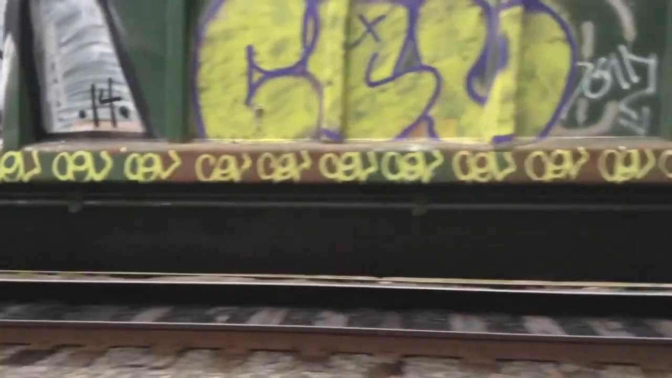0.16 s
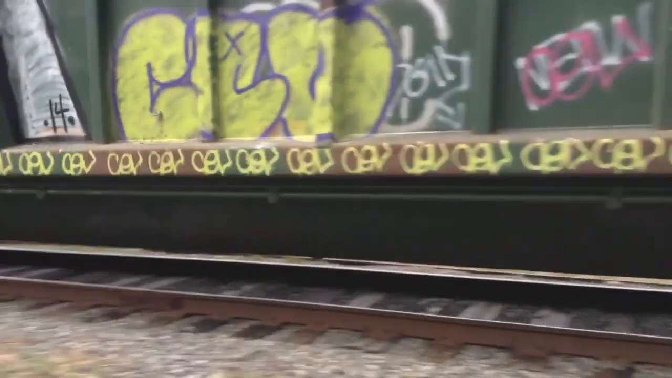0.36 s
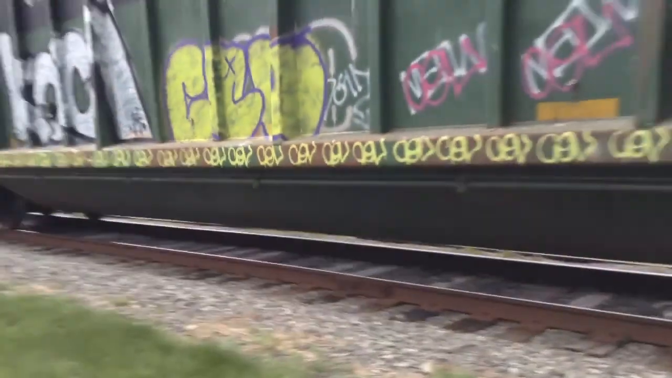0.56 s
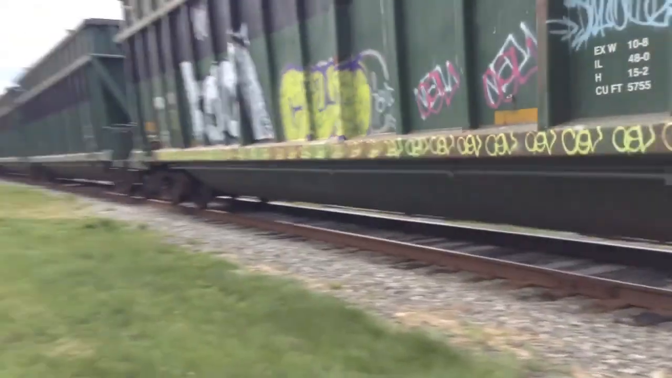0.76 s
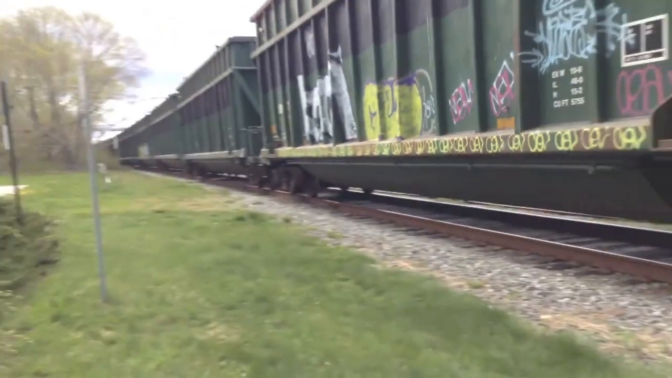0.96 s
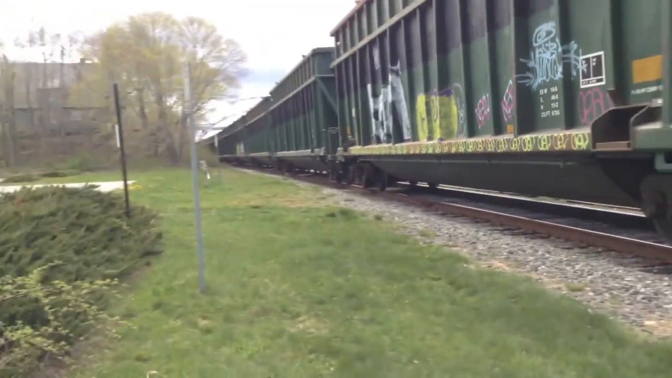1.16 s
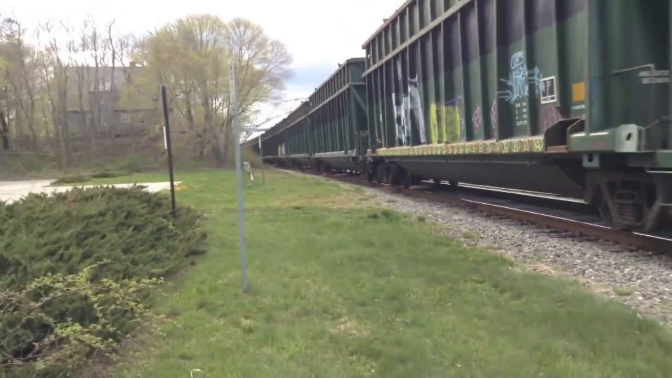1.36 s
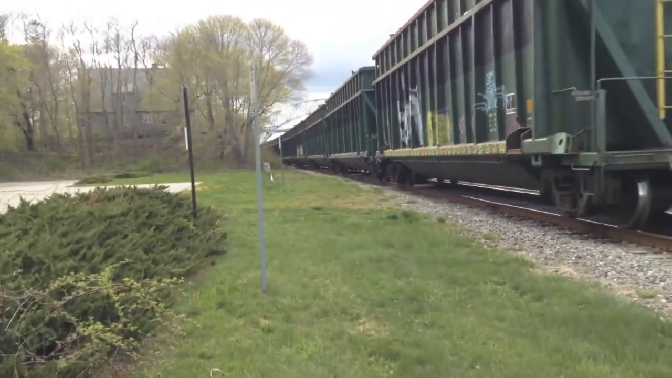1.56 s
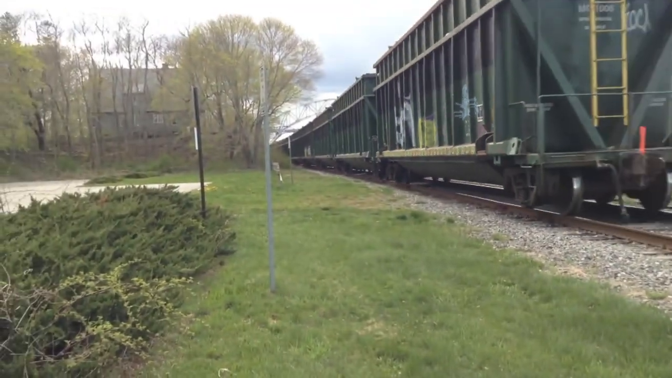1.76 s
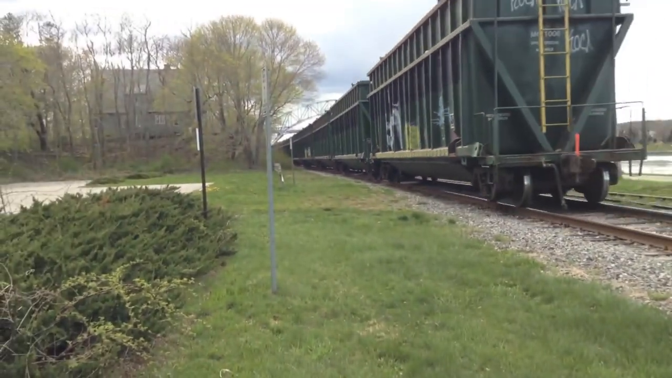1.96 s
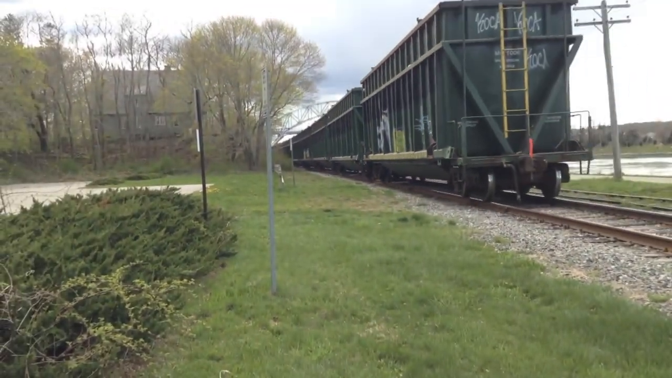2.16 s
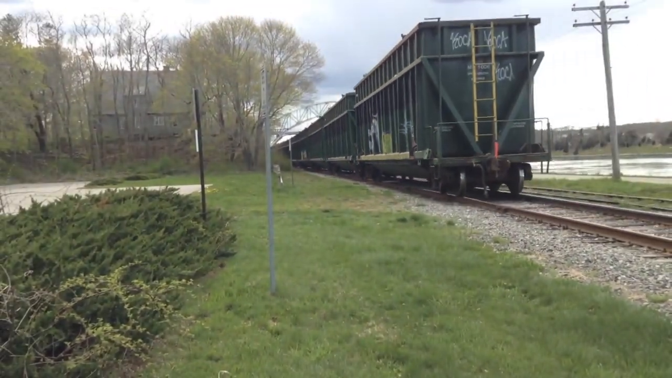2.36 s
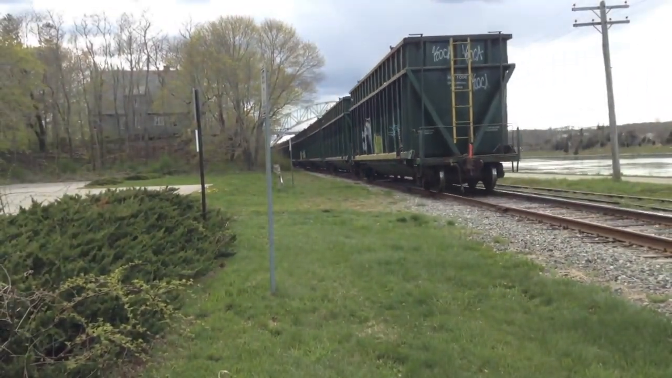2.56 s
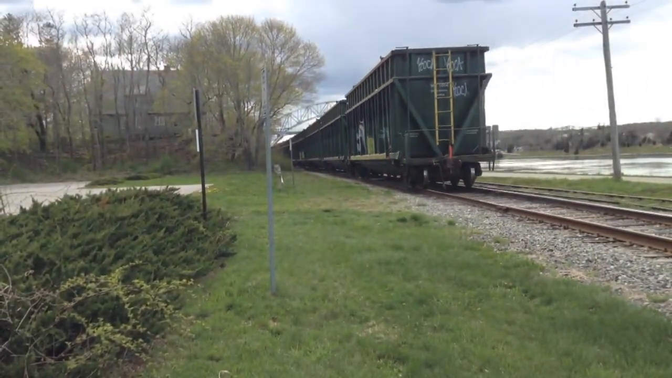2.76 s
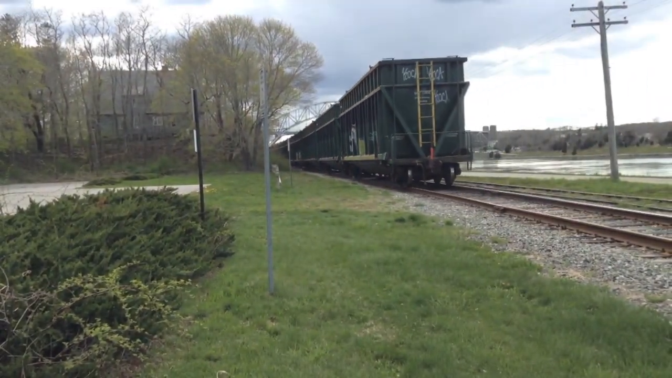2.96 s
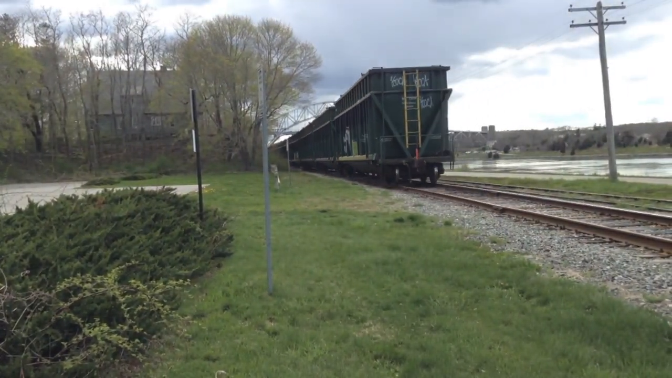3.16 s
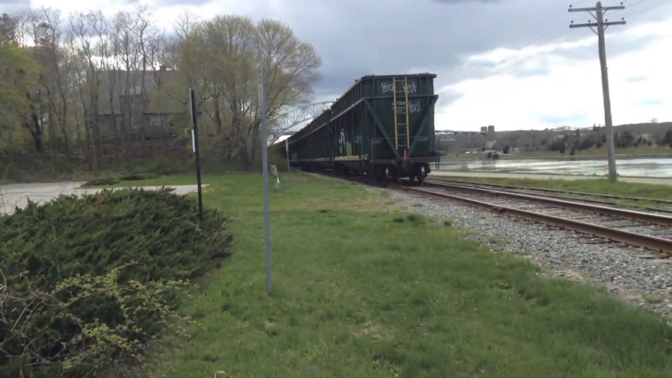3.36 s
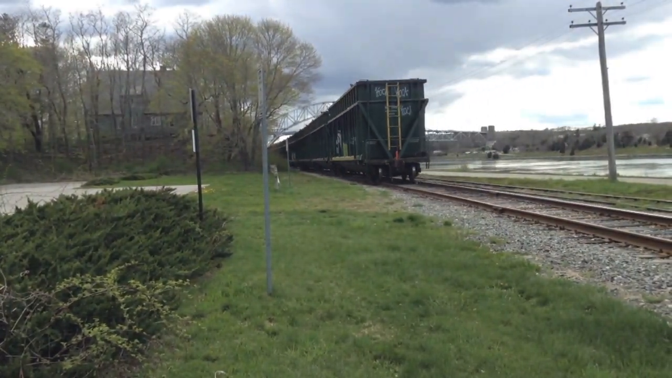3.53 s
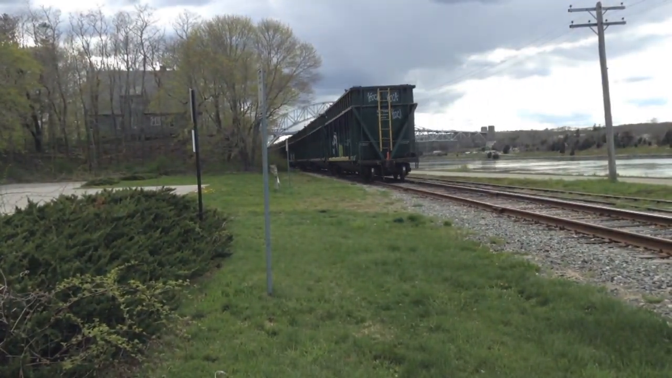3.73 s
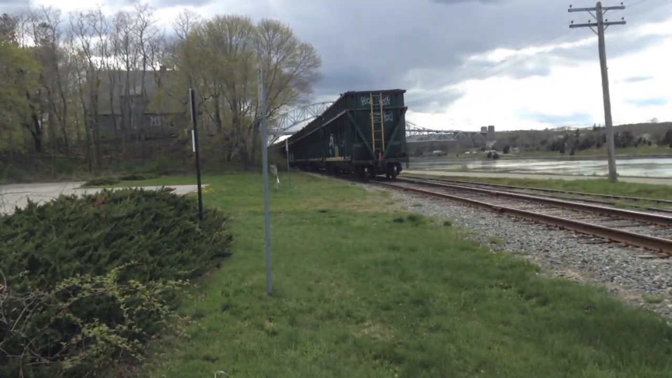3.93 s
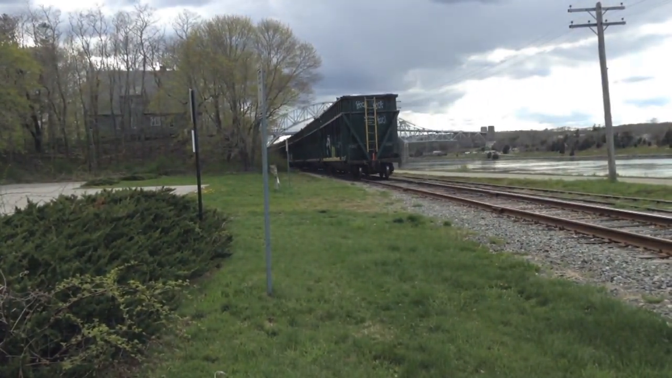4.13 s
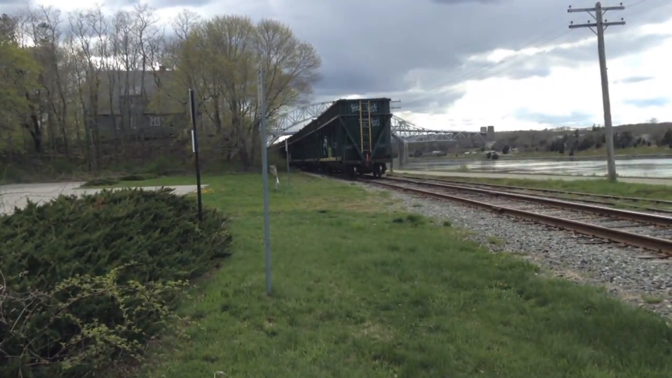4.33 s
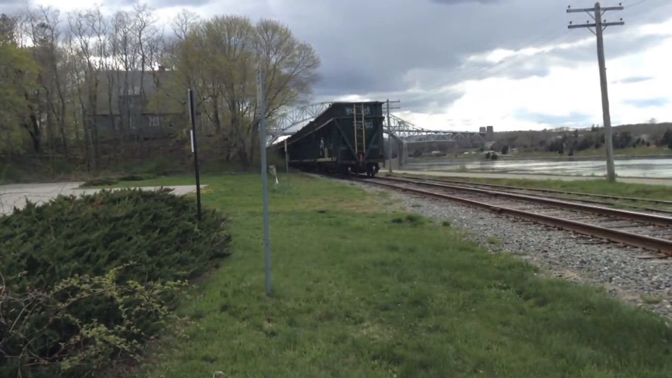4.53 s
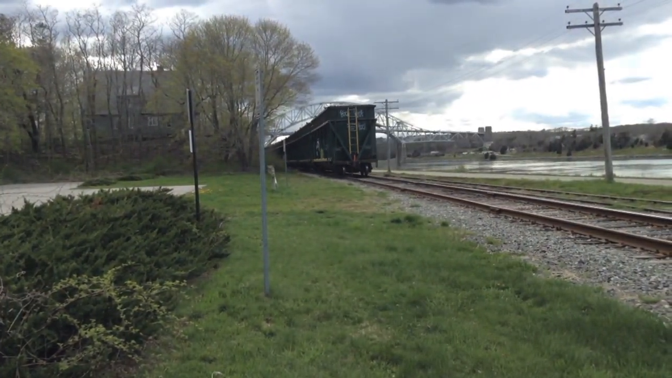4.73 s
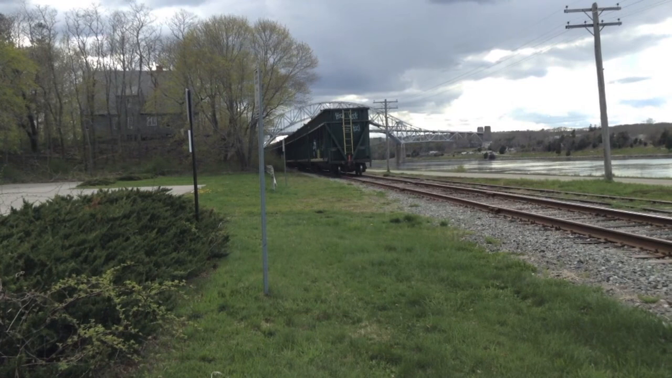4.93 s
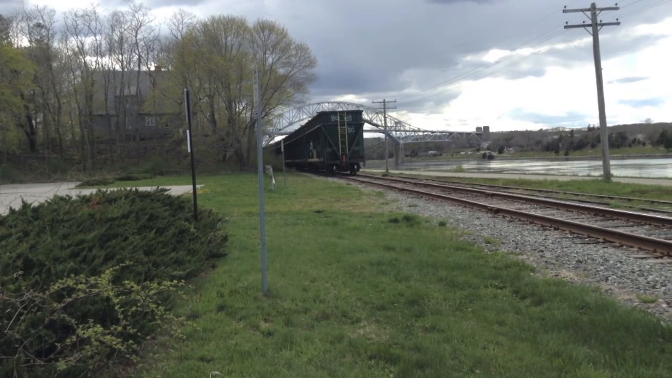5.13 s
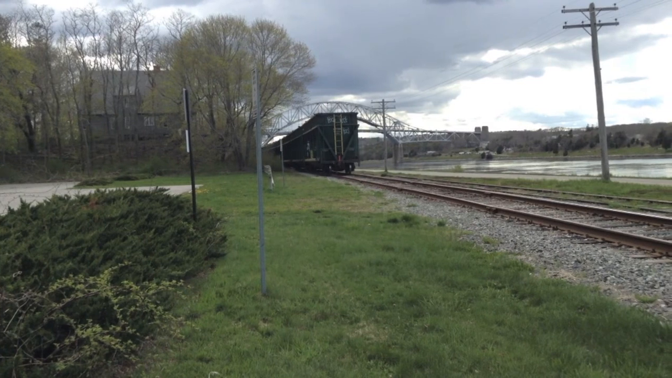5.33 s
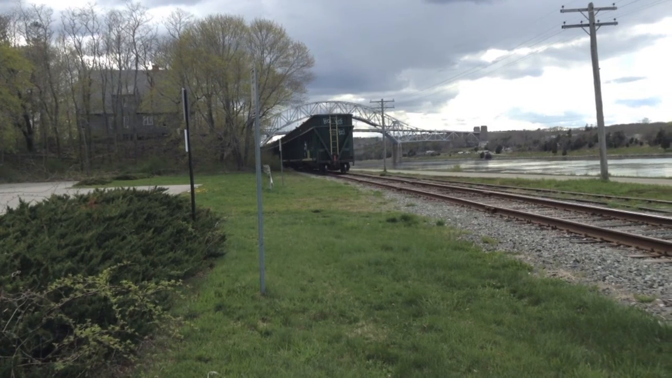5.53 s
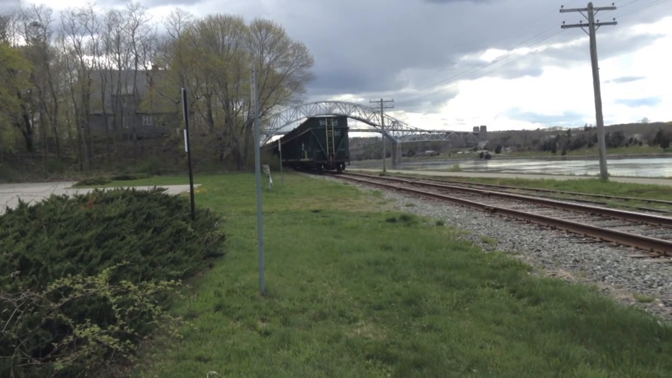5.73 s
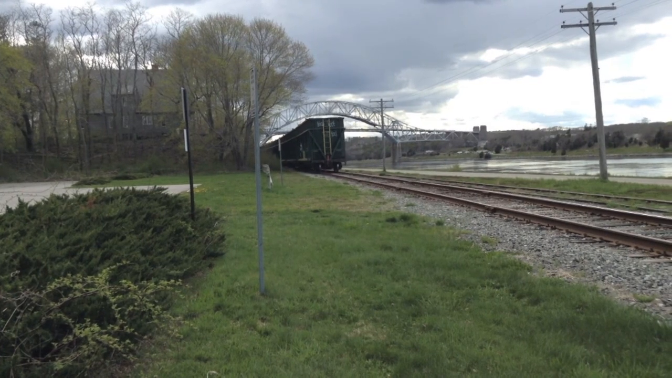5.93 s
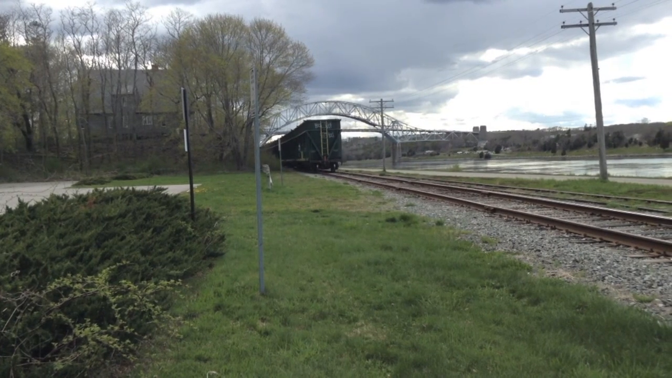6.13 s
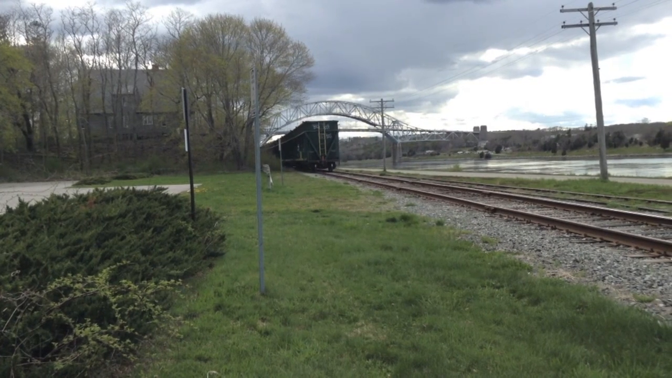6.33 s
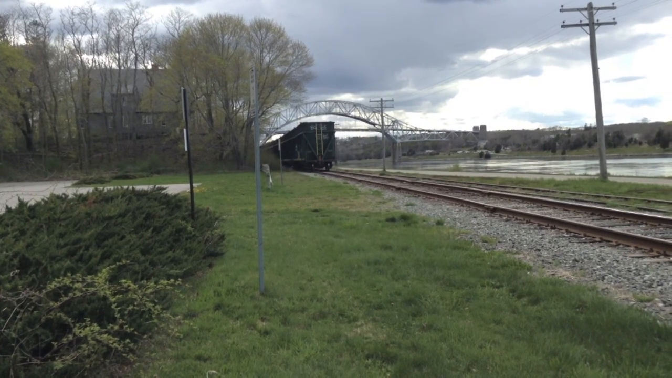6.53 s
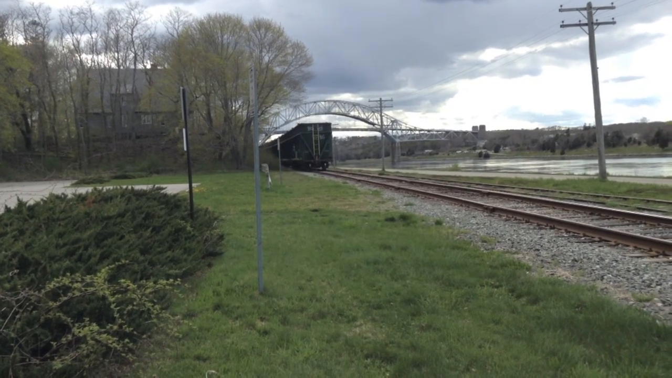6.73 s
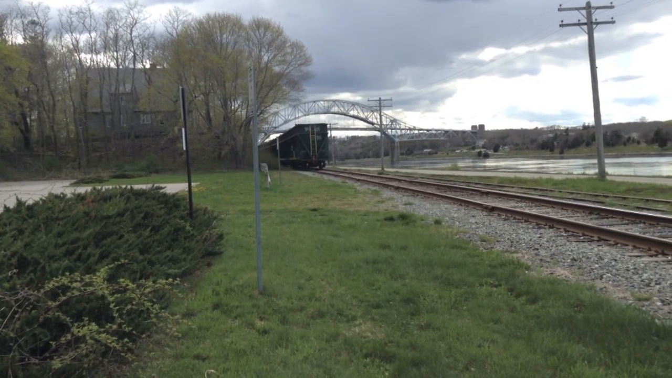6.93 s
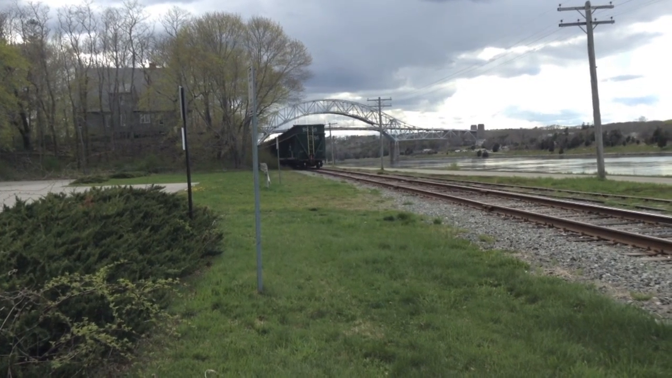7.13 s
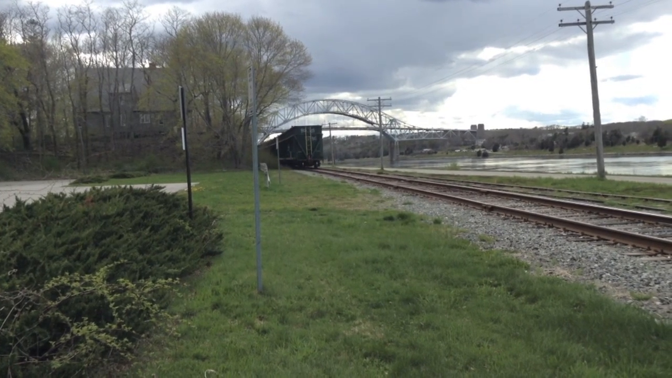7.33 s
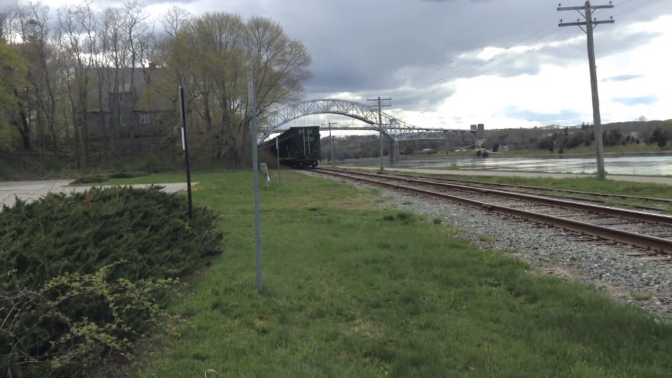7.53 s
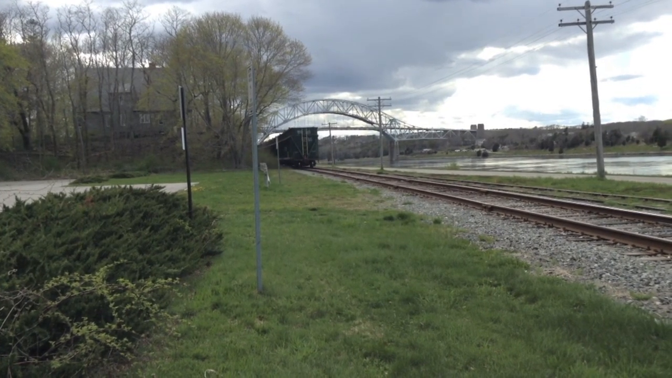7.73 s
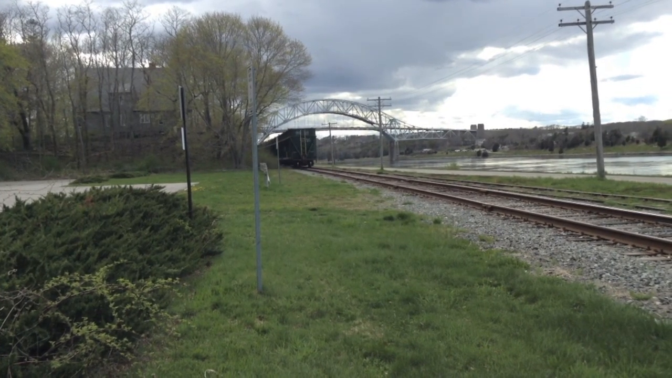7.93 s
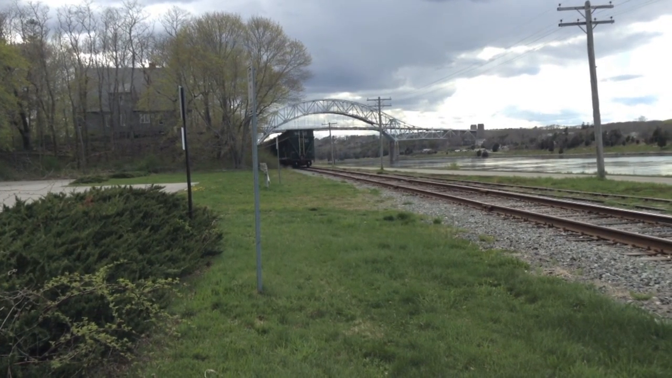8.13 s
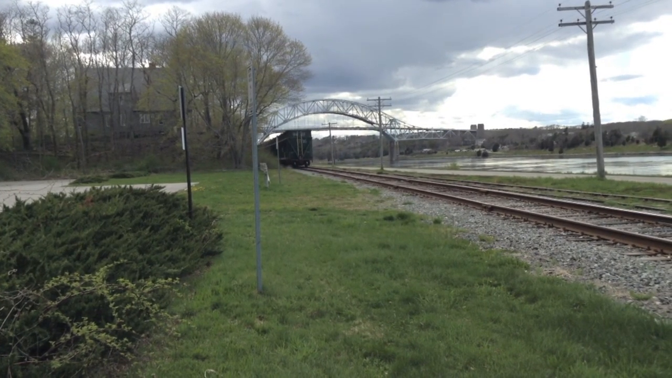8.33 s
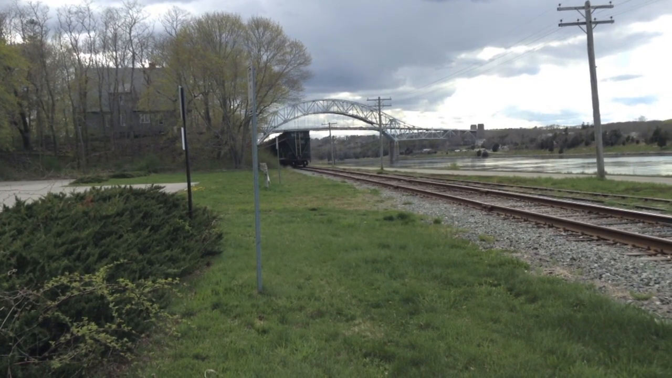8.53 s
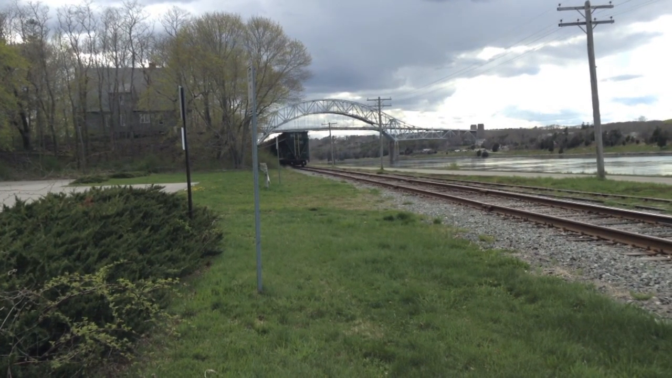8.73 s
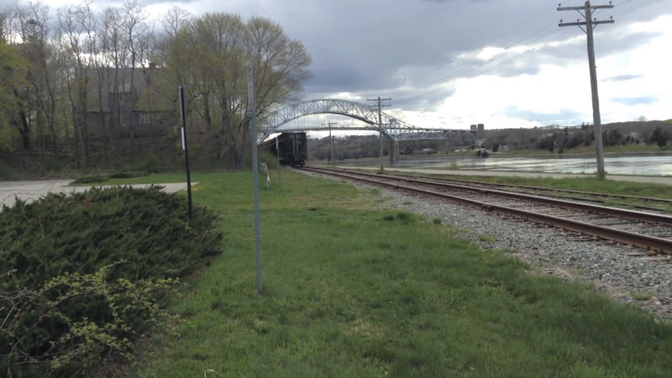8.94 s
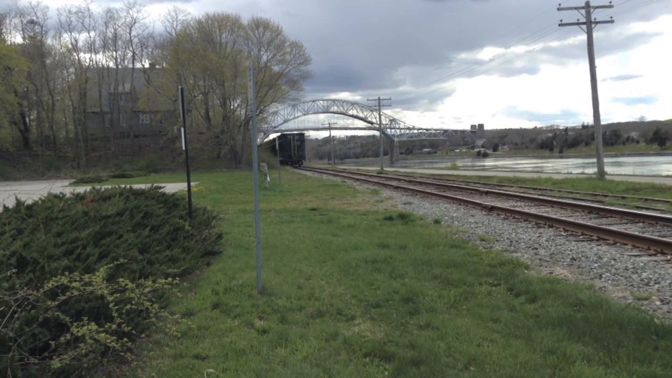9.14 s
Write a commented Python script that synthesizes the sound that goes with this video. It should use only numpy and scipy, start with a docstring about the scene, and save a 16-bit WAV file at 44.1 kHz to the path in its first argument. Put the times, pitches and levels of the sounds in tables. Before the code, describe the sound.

Heavy rail wagons rumble by with joint knocks, steel clanks and piercing wheel squeals, then fade into distant, pulsing metallic grinding outdoors.

```python
"""Beside a curved railway, a few metres off: the last cars of a freight train roll past and recede over grass.
Noise through panel resonances makes the rumble; struck modes and noise bursts make joints, clanks and taps.
Flanges grind in surges about once a second: stick-slip grains excite wheel resonances.
Jittered tones make the wheels squeal and sing. With distance the ground swallows a band of the rumble."""
import sys
import numpy as np
from scipy import signal
from scipy.fft import rfft, irfft, next_fast_len
from scipy.io import wavfile
from scipy.ndimage import uniform_filter1d, map_coordinates

SR = 44100
rng = np.random.default_rng(int(sys.argv[2]) if len(sys.argv) > 2 else 0)


def master(y):
    """Save y as 16-bit WAV."""
    cut = np.clip(np.atleast_2d(y).T, -1, 1)
    pcm = np.round(cut * 32767)  # scale
    wavfile.write(sys.argv[1], SR, pcm.astype(np.int16))


N = 405279
T = np.arange(N) / SR
FRAME = 1024  # samples in one frame of a moving filter

# the train's steady speed [m/s], and how far the track is from the listener [m]
SPEED_M_S, TRACK_M = 7.5, 4.5
# when the grinding wheel and the tail of the train go by [s]
WHEEL_PASSES_S, TAIL_PASSES_S = 1.08, 1.795
# the train is 3 dB down when its tail is FADE_M away; ground and air have their full effect at FAR_M
FADE_M, FAR_M = 14.25, 49


def undb(db):
    """Logarithmic level: decibels to amplitude gain."""
    return 10 ** (np.asarray(db) / 20)


def curve(rows, t=T):
    """Linear interpolation of a table (time [s], value)."""
    return np.interp(t, *np.transpose(rows))


def unit(x):
    """Power normalisation: scale to rms 1."""
    return x / np.sqrt(np.mean(x ** 2))


def walk(rate, t=T):
    """Band-limited fluctuation: random knots, rate per second, joined by lines; spread about 1."""
    knots = rng.standard_normal(len(t) // 16 + 2)
    return 1.22 * np.interp((t - t[0]) * rate, np.arange(len(knots)), knots)


def colour(x, points, peaks=()):
    """Linear filtering: give x a smooth spectrum with resonances on top; rms 1."""
    size = next_fast_len(N, True)
    hz = np.arange(size // 2 + 1) * SR / size + 1e-3
    at, db = np.transpose(points)
    db = np.interp(np.log(hz), np.log(at), db)
    for centre, width, peak_db in peaks:
        db = db + peak_db / (1 + (2 * (hz - centre) / width) ** 2)
    spectrum = rfft(x, size) * undb(db)
    return unit(irfft(spectrum, size)[:N])


def reshape(x, gain_db):
    """Time-varying filtering in short frames: gain_db(seconds, Hz)."""
    hz, t, z = signal.stft(x, SR, nperseg=FRAME)
    filtered = z * undb(gain_db(t, hz[:, None] + 1))
    return signal.istft(filtered, SR, nperseg=FRAME)[1][:N]


def grains(rate, spread_db):
    """Shot noise: dense tiny impacts, about rate per second, of uneven size; rms 1."""
    size = undb(spread_db * np.minimum(rng.exponential(size=N), 5))
    impacts = rng.random(N) < rate / SR
    return unit(impacts * size * rng.standard_normal(N))


def tone(hz, width_hz, flutter_db, t=T):
    """Friction-driven oscillation: the pitch jitters and the grip comes and goes; rms 1."""
    jitter = 0.9 * walk(265, t) + 0.295 * walk(17.8, t)
    phase = 2 * np.pi * np.cumsum(hz + width_hz * jitter) / SR
    flutter = walk(34.2, t) + 2.2 * walk(139, t)
    return unit(np.sin(phase) * undb(flutter_db * flutter))


def add(out, start, sound):
    """Superposition: mix a sound into out from its start time on."""
    place = out[max(int(start * SR), 0):][:len(sound)]
    place += sound[:len(place)]


def blows(times, db):
    """Impulsive excitation: one impulse at each time."""
    return np.bincount(np.clip(times * SR, 0, N - 1).astype(int), undb(db), N)


def ring(push, modes):
    """Modal resonance: damped modes set ringing by a force; neighbours swing opposite ways."""
    out = 0
    for k, (hz, db, t60) in enumerate(modes):
        pole = np.exp((2j * np.pi * hz - np.log(1000) / t60) / SR)
        swing = signal.lfilter([1], [1, -pole], push + 1e-18).imag
        out = out + (-1) ** k * undb(db) * swing
    return out


def burst(hits, rise, t60, tail_db, tail_t60, delay=0):
    """Exponential decay after each impulse: quick rise, quick fall and a weaker tail."""
    age = np.maximum(T[:SR] - delay, 0)
    tail = undb(tail_db) * np.exp(-np.log(1000) * age / tail_t60)
    fall = np.exp(-np.log(1000) * age / t60) + tail
    return signal.fftconvolve(hits, (1 - np.exp(-age / rise)) * fall)[:N]


def gone_m(t):
    """Uniform motion: how far the tail of the train has rolled past the listener."""
    return SPEED_M_S * np.maximum(t - TAIL_PASSES_S, 0)


def spreading_db(t=T):
    """Geometric spreading: the (negative) level change as the train recedes."""
    return -10 * np.log10(1 + (gone_m(t) / FADE_M) ** 2)


def farness(t=T):
    """Propagation over ground and through air: how much it colours the sound, 0 near, 1 far."""
    return np.minimum(gone_m(t) / FAR_M, 1) ** 1.96


def doppler():
    """Doppler effect: pitch factor of the grinding wheel, above 1 as it comes, below as it goes."""
    along = SPEED_M_S * (T - WHEEL_PASSES_S)
    return 1 - SPEED_M_S / 343 * along / np.hypot(along, TRACK_M)


# flanges press against the rail; levels are close by, before the overall gain of the grinding:
# (start [s], attack [s], hold [s], level [dB], sharpness = top against middle [dB], lingering scrape [dB])
SURGES = [(-0.1, 0.039, 0.34, -20.5, -1, -22), (0.11, 0.061, 0.18, -21.5, 4, -6),
          (0.295, .006, 0.029, -20.5, 0, -28), (0.42, .05, 0.25, -36, 5, -7),
          (0.762, 0.011, 0.35, -26, 4.5, -5.5), (1.15, 0.059, 0.25, -34, -1.5, -8),
          (1.416, .003, .008, -29.5, 9, -18), (1.448, 0.005, 0.67, -24.5, 3.5, -5),
          (1.468, 0.007, 0.058, -23.5, 0, -4), (2.488, 0.022, 0.086, -35, 10, -0.5),
          (2.61, 0.03, 0.44, -28, 3, -1), (3.548, 0.041, 0.35, -23, -1, -3),
          (4.398, 0.022, 0.29, -23.5, -2, 1.5), (5.318, 0.035, 0.34, -24.5, -0.5, -3),
          (5.803, 0.025, 0.12, -27.5, -3.5, -7), (6.394, 0.012, 0.64, -28, 0.5, -4.5),
          (7.4, 0.052, 0.28, -29, -4, 0.5), (7.88, 0.042, 0.21, -28, -2.5, -5.5),
          (8.29, .02, 0.062, -31.5, -1.5, 0), (8.502, 0.026, 0.44, -28, -4.5, -7)]
# a surge lets go quickly, leaving a scrape that dies slowly [s]
RELEASE_S, LINGER_S = 0.027, 0.39
# light rubbing of all the flanges: level before the overall gain, sharpness, sharpness change far off [dB]
RUB_DB, RUB_SHARP_DB, RUB_DULLING_DB = -32.5, -10, 1.5
# the share of the loss with distance that this rubbing suffers, coming from the whole length of the train
RUB_FADE = 0.92
# the last wagon screens the rubbing [dB]; the screen opens over this time [s] until its end has passed
SCREEN_DB, SCREEN_OPENS_S = -6.5, 0.63


def flange_contact():
    """Power addition: level and sharpness [dB] of surges over rubbing; the stronger sets the sharpness."""
    screened = np.clip((TAIL_PASSES_S - T) / SCREEN_OPENS_S, 0, 1)
    power = undb(RUB_DB + RUB_FADE * spreading_db() + SCREEN_DB * screened) ** 2
    sharp = power * (RUB_SHARP_DB + RUB_DULLING_DB * farness())
    for start, attack, hold, db, sharp_db, linger_db in SURGES:
        age = np.maximum(T - start, 0)
        after = np.maximum(age - hold, 0)
        linger = undb(linger_db)
        release = (1 - linger) * np.exp(-after / RELEASE_S) + linger * np.exp(-after / LINGER_S)
        peak = undb(db + spreading_db(start + hold / 2))
        surge = (peak * (1 - np.exp(-age / attack)) * release) ** 2
        power, sharp = power + surge, sharp + surge * sharp_db
    return 10 * np.log10(power), sharp / power


# spectrum of the grinding: (frequency [Hz], density [dB per Hz])
GRIND_COLOUR = [(400, -23.5), (900, -5.5), (1700, -2.5), (2700, 1), (3500, -3), (5300, -1), (7000, -.5),
                (8700, -1), (10200, -3.5), (12000, -5), (13300, -5), (15300, -11.5)]
# wheel resonances under it, at their final receding pitch: (frequency [Hz], width [Hz], height [dB])
WHEEL = [(1436, 44, 4.5), (1828, 47, 7.5), (3120, 45, 5.5), (4350, 1300, 5), (6050, 620, 5.5),
         (7520, 160, 6), (7930, 180, 6), (9360, 240, 4.5), (10990, 440, 4)]


def grinding():
    """Stick-slip friction: grains between flange and rail ring the wheel; harder contact is sharper."""
    level_db, sharpness_db = flange_contact()
    slips = grains(rate=30000, spread_db=1.0) * undb(.5 * walk(45) + 0.47 * walk(220))
    resonant = colour(slips, GRIND_COLOUR, WHEEL)
    # all these resonances sink with the Doppler shift, relative to its last value
    shift = doppler()
    scrape = map_coordinates(resonant, [np.cumsum(shift / shift[-1])], order=3, mode="mirror")

    def contact_db(t, hz):
        sharp_db = np.interp(t, T, sharpness_db)
        octaves = np.log2(hz / 4000)
        # a sharp contact gains treble and loses its lower rasp
        treble_db = sharp_db * np.clip(octaves / 1.05, -.15, 1.6)
        rasp_db = 1.84 * np.maximum(sharp_db, 0) * np.clip(octaves, -2, 0)
        # the contact point wanders, so the wheel's many fine modes take turns to ring
        modes = rng.standard_normal((len(hz), len(t)))
        modes = unit(uniform_filter1d(uniform_filter1d(modes, size=14), size=5))
        air_db = -13 * farness(t) * (hz / 13000) ** 4
        return treble_db + rasp_db + 3.94 * modes + air_db
    return reshape(scrape * undb(level_db + 4.5), contact_db)


# the wheels' squeals build up, hold and ring out: (start [s], build-up [s], hold [s], level [dB],
# fall [dB per s], frequency [Hz], roughness [0-1])
SQUEALS = [(0, .3, .06, -20.5, 43, 6180, .7), (.768, .024, .021, -12.5, 650, 6140, .2),
           (.838, .01, .009, -14, 900, 6125, .15), (.8, .02, .24, -17.3, 72, 6140, .8),
           (1.11, .03, .1, -26, 160, 6020, .35), (1.42, .13, .23, -24.5, 45, 5995, .5),
           (2.45, .45, .14, -22.8, 65, 7660, .25), (2.66, .25, .22, -30, 75, 6020, .85),
           (4.383, .18, .13, -26, 33, 5970, .3), (6.4, .07, .47, -43, 30, 5950, .75)]
# the level a squeal grows from (against its peak), and how fast a rough one's grip changes
SQUEAL_SEED_DB, GRIP_HZ = -23, 260


def squealing():
    """Self-excited vibration: a mode grows until grip saturates, then rings out; uneven grip roughens it."""
    out, age = np.zeros(N), T[:2 * SR]
    for start, build, hold, db, db_per_s, hz, rough in SQUEALS:
        growth_db = SQUEAL_SEED_DB * np.clip(1 - age / build, 0, 1)
        fall_db = db_per_s * np.maximum(age - build - hold, 0)
        # the complex random part spreads a skirt round the steady line
        uneven = walk(GRIP_HZ, age) + 1j * walk(GRIP_HZ, age)
        grip = np.sqrt(2 * (1 - rough ** 2)) + rough * uneven
        phase = 2 * np.pi * np.cumsum(hz + 9 * walk(25, age)) / SR
        add(out, start, undb(db + growth_db - fall_db) * (grip * np.exp(1j * phase)).real)
    return out


# wheels hitting rail joints, before the gains of the parts: (time [s], level [dB], crack against thud [dB])
JOINTS = [(.003, -24.5, -2), (0.116, -35, 7), (0.157, -29.5, 2.5), (.335, -26, -12), (0.448, -25, -9),
          (0.613, -32.5, -1), (.66, -26, -14), (.927, -28, -11), (1.083, -28, -2), (1.247, -24.5, -1),
          (1.582, -32, -4), (1.694, -32, 2.5), (2.031, -25, -4), (2.172, -32, 3), (2.195, -27.5, -6),
          (2.617, -32, -1), (2.835, -28, -16), (3.098, -35.5, 2), (3.544, -34, 0.5), (5.68, -34, -6),
          (7.9, -38, -21)]
# the wagon body when a wheel drops: (frequency [Hz], relative level [dB], 60 dB decay time [s])
BODY_MODES = [(166, -3, .05), (225, 2, .035), (341, -1, .04), (548, -3, .022)]
# spectra of the frame's shudder and of the crack: (frequency [Hz], density [dB per Hz])
THUD_COLOUR = [(40, -42), (100, -36), (150, -4), (220, 4), (330, -9), (520, -1), (900, -15), (2000, -13),
               (6000, -40)]
CRACK_COLOUR = [(60, -54), (220, 3.5), (540, -3), (900, 1), (1400, -3), (3000, -3.5), (6000, -16),
                (15000, -18)]


def joints():
    """Impact excitation: a wheel cracks onto the next rail end; then the body knocks and its frame shudders."""
    times, db, crack_db = np.transpose(JOINTS)
    crack = burst(blows(times, db + crack_db), rise=0.00014, t60=0.17, tail_db=-6.0, tail_t60=0.33)
    crack = crack * colour(rng.standard_normal(N), CRACK_COLOUR)
    # the body answers 5.9 ms after the crack
    drops = blows(times + 0.0059, db)
    shudder = burst(drops, rise=0.0044, t60=0.11, tail_db=-16, tail_t60=0.43)
    shudder = shudder * colour(rng.standard_normal(N), THUD_COLOUR)
    return undb(4.0) * ring(drops, BODY_MODES) + undb(1.5) * shudder + undb(5.0) * crack


# the heaviest blows knock through track and bogie, each a short falling note:
# (start [s], length [s], first frequency [Hz], last frequency [Hz], peak level [dB])
KNOCKS = [(.167, .03, 500, 130, -20), (.561, .02, 560, 180, -19.5), (1.083, .008, 580, 470, -19.5),
          (1.093, .009, 290, 180, -16), (1.246, .003, 1600, 700, -14), (1.249, .015, 240, 140, -14.5),
          (1.586, .012, 430, 330, -20), (2.011, .012, 680, 460, -19.5), (2.033, .019, 270, 200, -19),
          (2.172, .017, 680, 280, -16), (2.22, .009, 330, 260, -21)]


def knocks():
    """Bending-wave dispersion: struck steel's faster, higher waves arrive first, in short rough notes."""
    out = np.zeros(N)
    for start, length, first_hz, last_hz, db in KNOCKS:
        progress = np.linspace(0, 1, int(length * SR))
        hz = first_hz * (last_hz / first_hz) ** progress
        swell = 2 * np.sqrt(progress * (1 - progress))
        rattle = .25 * walk(400, progress * length)
        note = np.sin(2 * np.pi * np.cumsum(hz) / SR)
        add(out, start, undb(db) * swell * (1 + rattle) * note)
    return out


# steel knocking on steel under a wagon: (time [s], level [dB])
CLANKS = [(.767, -15.5), (0.918, -17.5)]
# its modes: (frequency [Hz], relative level [dB], 60 dB decay time [s])
CLANK_MODES = [(4167, -2.5, .17), (4608, 0, .17), (5100, -5, .055), (6970, -8, .07)]


def clanks():
    """Modal ringing after impact: loose steel gear strikes, chatters for an instant and rings."""
    strikes = blows(*np.transpose(CLANKS))
    chatter = burst(strikes, rise=.0005, t60=.075, tail_db=-11, tail_t60=.18) * rng.standard_normal(N)
    return ring(strikes, CLANK_MODES) + undb(-0.5) * chatter


# single modes of the wheels and wagon frames that sing up briefly:
# (start [s], length [s], frequency [Hz], width of the pitch jitter [Hz], peak level [dB])
SINGS = [(.018, .3, 2966, 80, -24.5), (.297, .29, 9770, 60, -27.5), (.366, .42, 8020, 28, -32),
         (.666, .077, 7060, 23, -28), (.768, .067, 12330, 25, -20), (.8, .34, 7770, 41, -28),
         (.941, .22, 1735, 16, -35), (1.65, .5, 1718, 6.5, -30.5), (1.682, .5, 10910, 33, -28),
         (1.963, .39, 9600, 37, -29.5), (2.66, .097, 4490, 16, -31), (2.7, .6, 1840, 20, -39),
         (2.856, .45, 4520, 14, -29.5), (3.18, .55, 4505, 45, -36), (3.65, .58, 4460, 55, -30),
         (3.882, .29, 9420, 70, -35), (4.141, .17, 7660, 3.7, -34), (4.46, .45, 7500, 14, -29),
         (4.52, .13, 1840, 12, -35), (4.406, .14, 2950, 220, -28), (4.542, .13, 3612, 28, -31.5),
         (4.8, .7, 4510, 44, -37), (5.338, .3, 7500, 17, -30), (5.341, .38, 2404, 5, -33),
         (5.345, .27, 6590, 13, -35.5), (5.348, .29, 4264, 7, -29), (5.363, .29, 9070, 12, -35),
         (5.803, .31, 7700, 8, -38), (5.97, .85, 4020, 60, -42.5), (6.18, .15, 364, 3, -42),
         (7.49, .17, 2520, 40, -42), (7.77, .09, 4550, 25, -38.5), (7.915, .2, 4280, 5.9, -34),
         (8.853, .34, 4270, 27, -42.5)]


def singing():
    """Friction-driven resonance: other modes of wheels and frames sing up briefly and fade."""
    out, age = np.zeros(N), T[:SR]
    for start, length, hz, width, db in SINGS:
        swell = np.interp(age / min(length, 1), [0, .06, .3, .75, 1], [0, .8, 1, .45, 0])
        add(out, start, undb(db) * swell * tone(hz, width, flutter_db=1.2, t=age))
    return out


# small fittings tapping: (time [s], level [dB], frequency [Hz])
TICKS = [(.614, -18.5, 2855), (2.344, -22, 3160)]
TICK_T60_S = 0.087


def ticks():
    """Single-mode impulse response: small steel fittings tap and ring for an instant."""
    out = 0
    for start, db, hz in TICKS:
        out = out + ring(blows(np.array([start]), [db]), [(hz, 0, TICK_T60_S)])
    return out


# level of the rumble before distance acts, steady after the last row: (time [s], level [dB])
RUMBLE = [(0, -27.5), (0.28, -30.5), (.47, -28.5), (0.68, -23.5), (0.86, -33), (1.2, -30.5), (1.5, -28),
          (1.85, -33), (2.25, -29.5)]
# spectrum of the rumble close by: (frequency [Hz], density [dB per Hz])
ROLL_COLOUR = [(25, -34), (45, -32), (70, -15), (105, -12.5), (135, -3.5), (200, 0), (270, -3.5), (400, 0),
               (650, -6), (1200, -8.5), (2000, -9.5), (4000, -15.5), (15000, -75)]
# booming panels of the wagons: (frequency [Hz], width [Hz], height [dB])
PANELS = [(126.7, 17, 4), (168, 14, 2.5), (232, 33, 2.5), (375, 12, 3.5)]


def rolling():
    """Roughness excitation and ground interference: treads shake the bodies; far off, grass echo cuts a band."""
    level_db = curve(RUMBLE) + spreading_db() + 0.59 * walk(14)
    body = colour(grains(rate=3000, spread_db=0), ROLL_COLOUR, PANELS) * undb(level_db)

    def ground_db(t, hz):
        dip_db = -19 * np.exp(-(np.log2(hz / 425) / 0.26) ** 2)
        middle_db = 2.8 * np.exp(-np.log2(hz / 1900) ** 2)
        # the bass carries best
        bass_db = 7 / (1 + (hz / 110) ** 2)
        return farness(t) * (dip_db + middle_db + bass_db)
    return reshape(body, ground_db)


def scene():
    """Superposition of all sources: the whole train, heard alike by both ears."""
    train = rolling() + grinding() + squealing() + singing() + joints() + knocks() + clanks() + ticks()
    return np.array([train, train])


TOP_HZ = 15400  # upper edge of the recorder's passband


def record(dry):
    """Band limiting and saturation: the microphone sheds deep bass; the recorder rounds peaks, cuts the top."""
    thin = signal.sosfilt(signal.butter(2, 60, "high", fs=SR, output="sos"), dry)
    rounded = np.tanh(0.91 * thin) / 0.89
    return signal.sosfilt(signal.ellip(10, .2, 80, TOP_HZ, fs=SR, output="sos"), rounded)


dry = scene()
out = record(dry)
master(out)
```